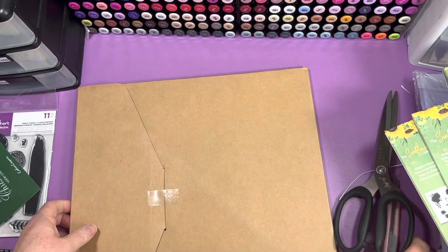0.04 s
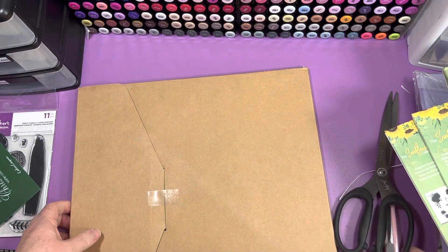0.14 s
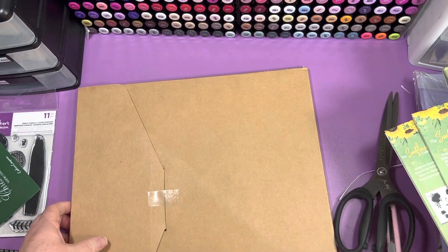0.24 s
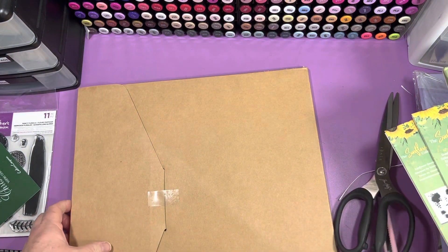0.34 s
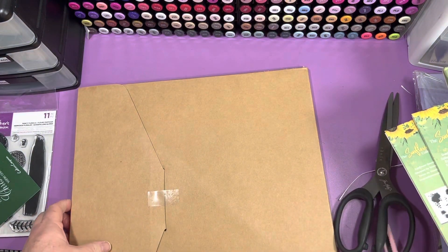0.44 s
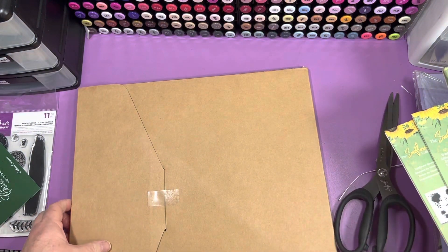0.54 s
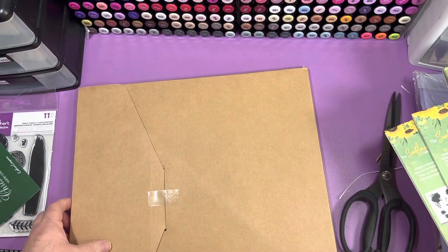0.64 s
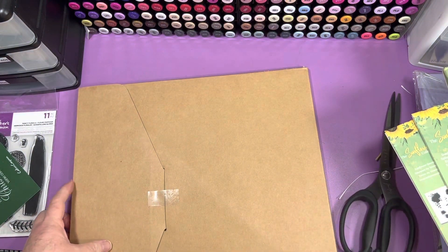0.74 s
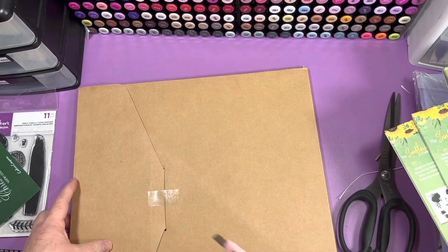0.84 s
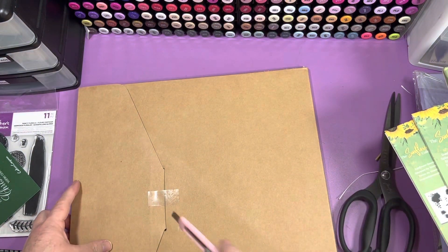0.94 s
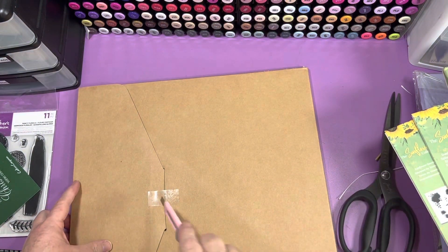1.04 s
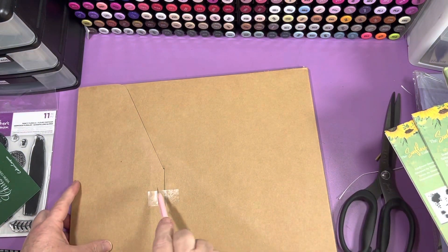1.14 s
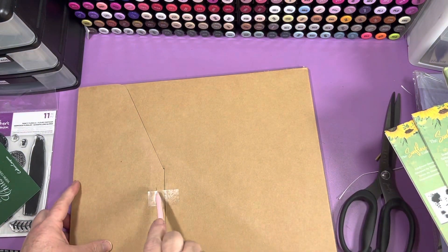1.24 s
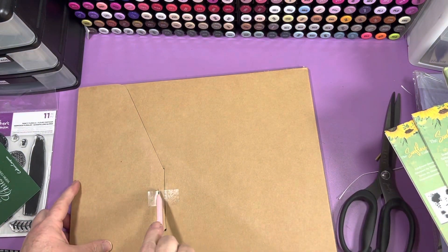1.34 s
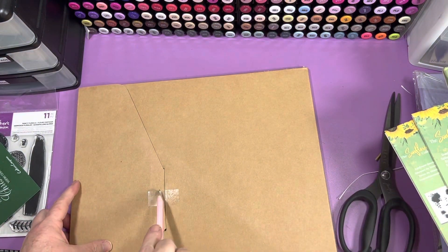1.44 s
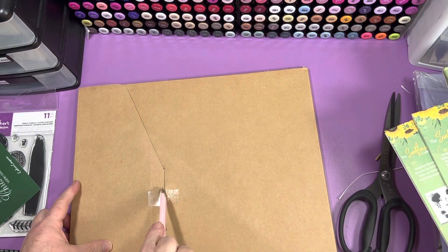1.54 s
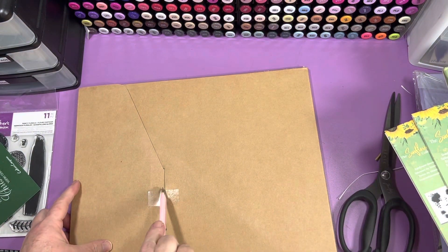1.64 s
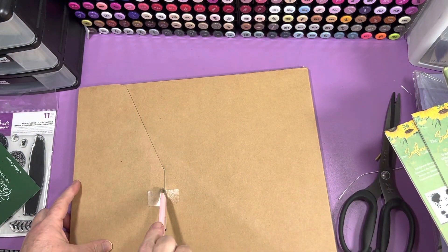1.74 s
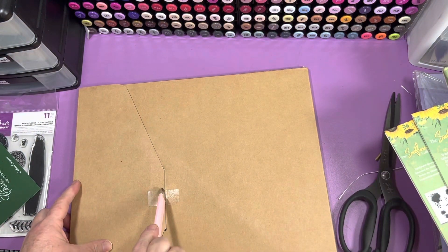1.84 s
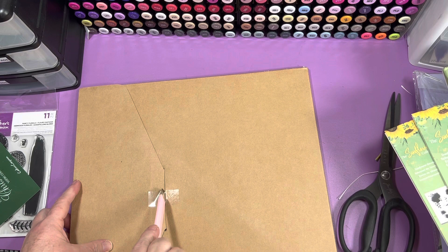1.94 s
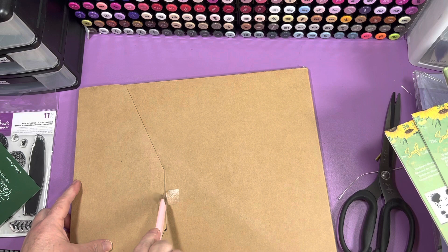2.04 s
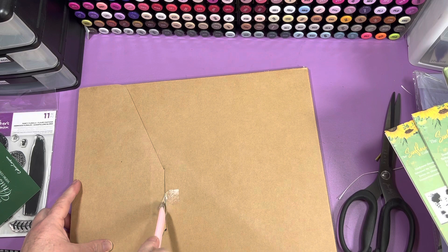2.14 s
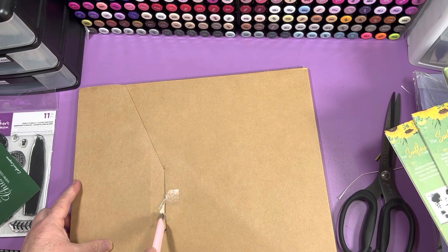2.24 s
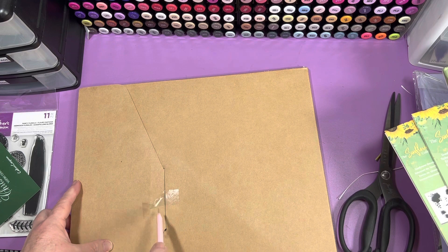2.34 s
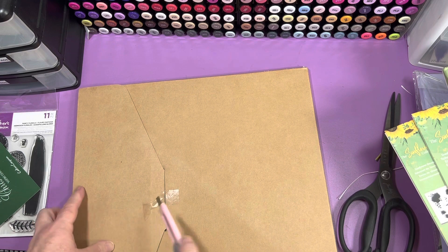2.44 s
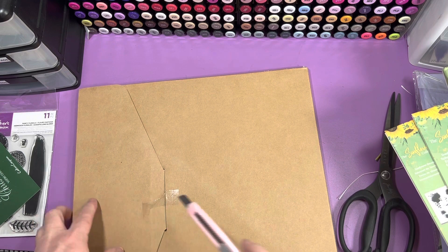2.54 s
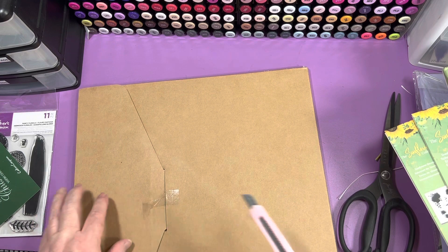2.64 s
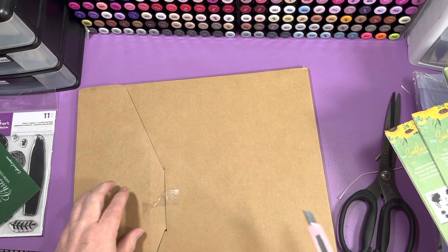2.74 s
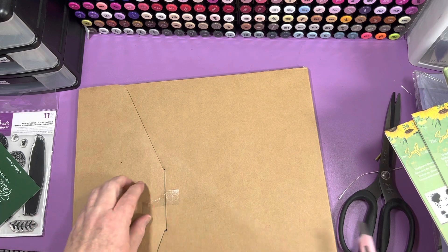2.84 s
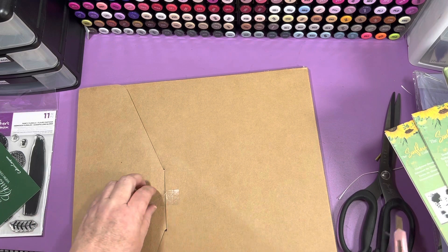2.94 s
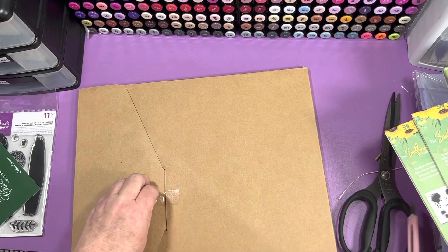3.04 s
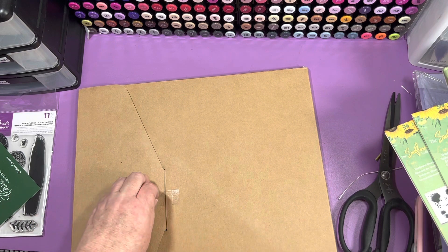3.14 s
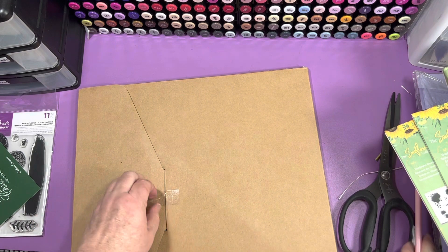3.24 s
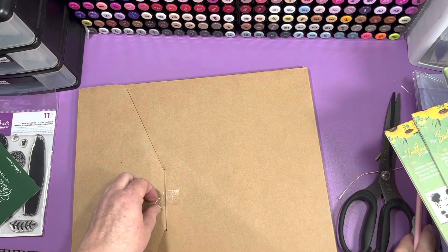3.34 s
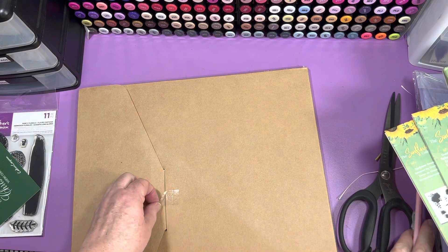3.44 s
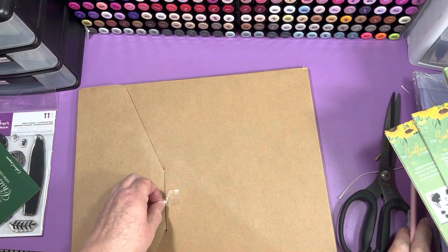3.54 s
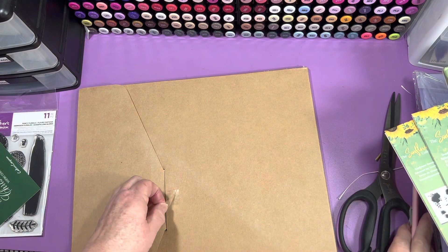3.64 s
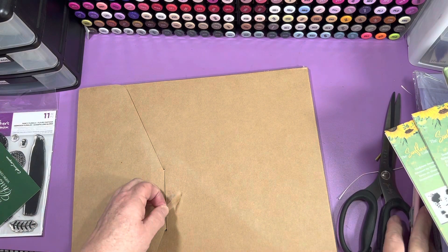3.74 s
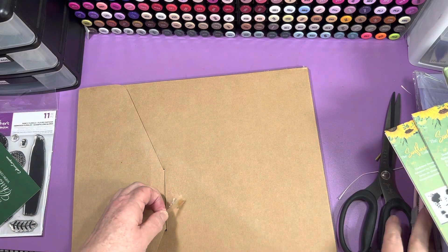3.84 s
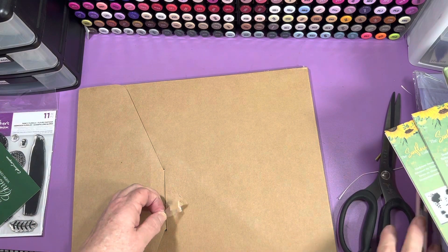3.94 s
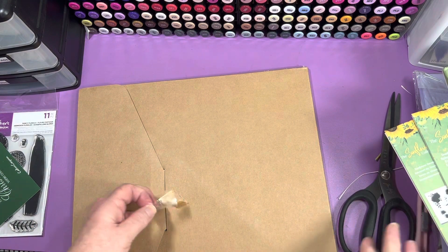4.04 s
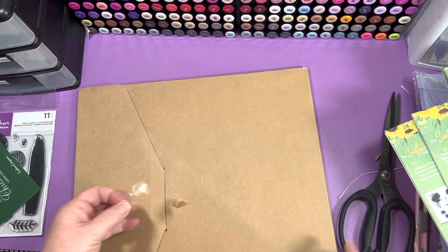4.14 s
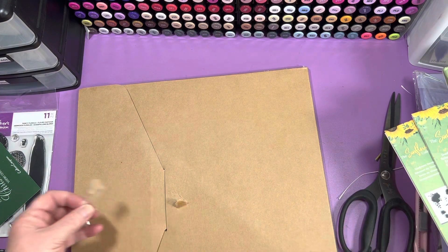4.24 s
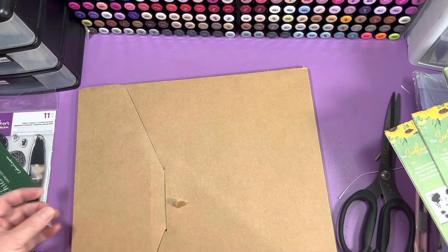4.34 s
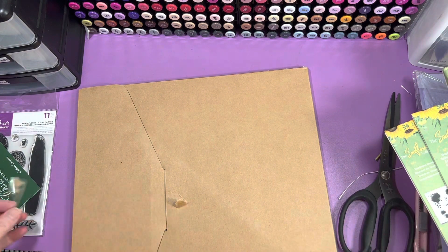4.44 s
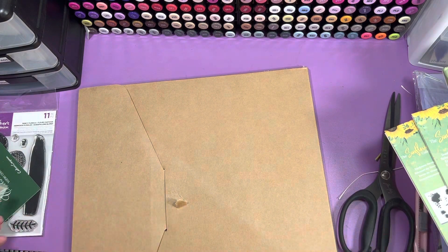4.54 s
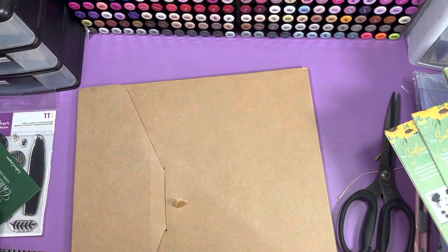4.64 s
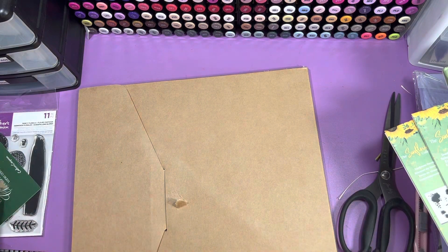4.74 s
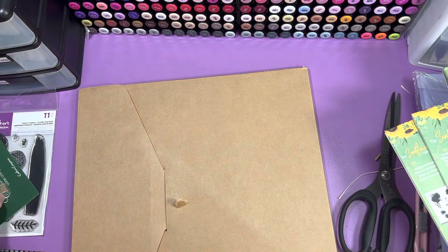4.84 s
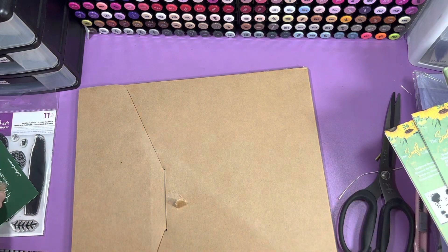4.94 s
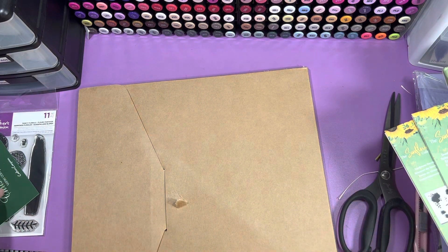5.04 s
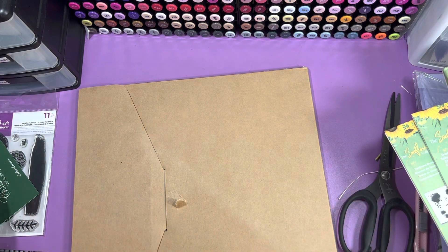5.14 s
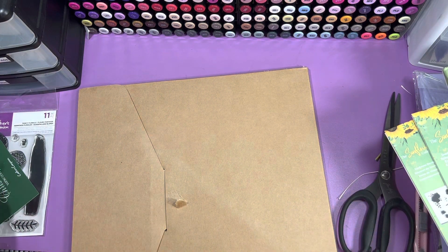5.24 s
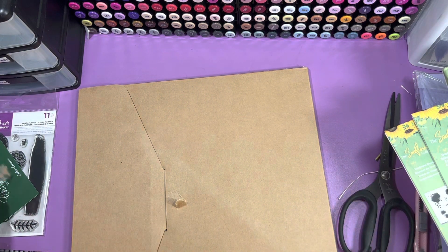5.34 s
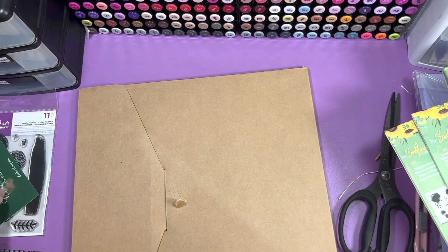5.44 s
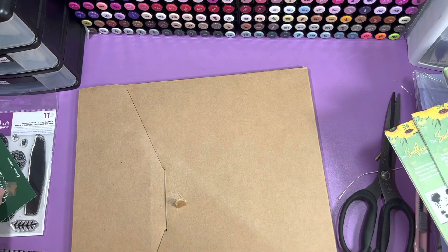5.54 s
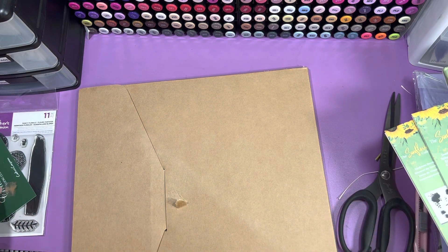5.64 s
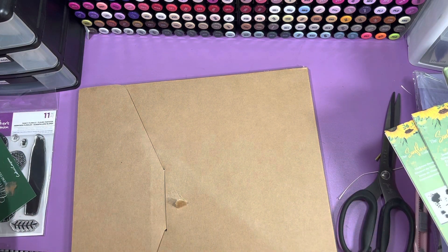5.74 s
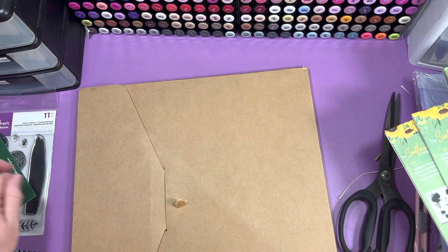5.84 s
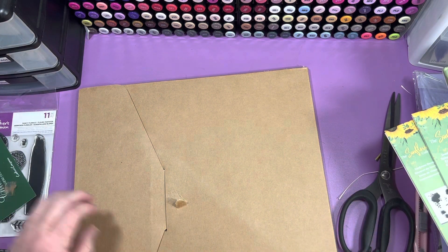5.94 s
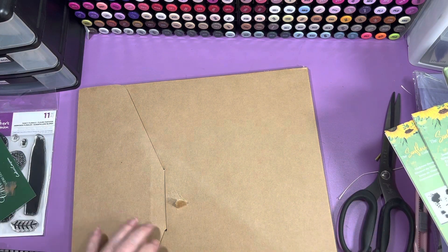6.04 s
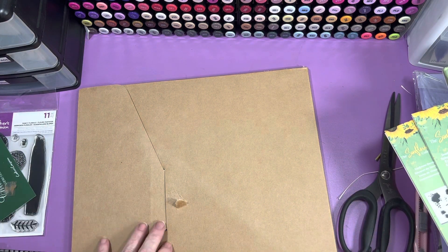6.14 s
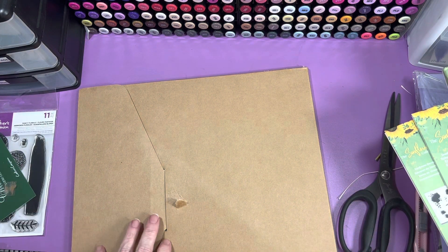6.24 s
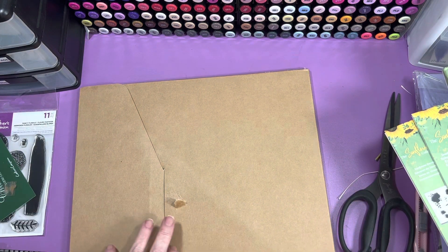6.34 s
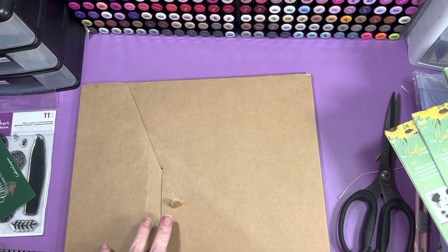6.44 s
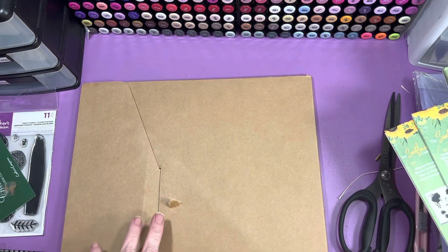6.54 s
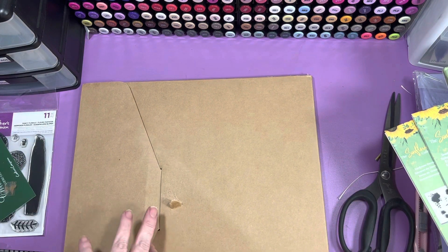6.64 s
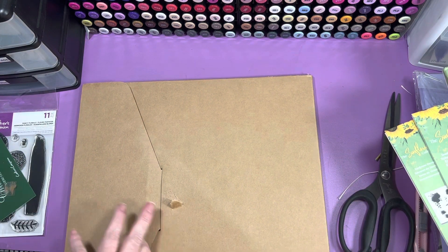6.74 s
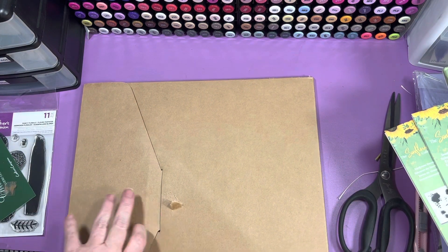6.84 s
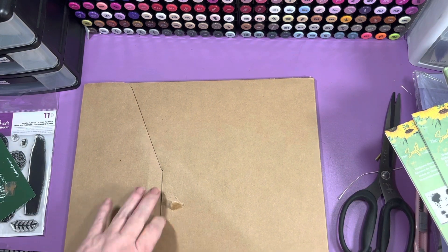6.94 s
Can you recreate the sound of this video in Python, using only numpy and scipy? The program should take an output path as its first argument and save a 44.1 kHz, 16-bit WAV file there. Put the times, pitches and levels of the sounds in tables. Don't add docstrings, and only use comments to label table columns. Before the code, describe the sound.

A knife handled on a desk picks at tape on a hollow cardboard mailer, then the tape rips off in jerks, crackles, and the flap is rubbed.

```python
import sys
import numpy as np
from scipy import signal
from scipy.fft import rfft, irfft
from scipy.io import wavfile
from scipy.ndimage import uniform_filter1d

SR = 44100
rng = np.random.default_rng(int(sys.argv[2]) if len(sys.argv) > 2 else 0)


def file_out(sig):
    cols = np.atleast_2d(sig).T
    lim = np.clip(cols, -1, 1)
    pcm = np.round(lim * 32767).astype(np.int16)
    wavfile.write(sys.argv[1], SR, pcm)


def decibels_to_gain(level_db):
    exponent = np.asarray(level_db, float) / 20
    return 10 ** exponent


N = 308259
FREQ = np.maximum(np.arange(N // 2 + 1) * SR / N, 1)


def unit(x):
    return x / np.sqrt(np.mean(x ** 2))


def along(table):
    hz, value = np.transpose(table)
    return np.interp(np.log(FREQ), np.log(np.maximum(hz, 1)), value)


def through(x, response):
    return irfft(rfft(x) * response, N)


def body(modes):
    response = 0
    for k, (hz, width, db) in enumerate(modes):
        response = response + (-1) ** k * decibels_to_gain(db) / (1 + 1j * (FREQ - hz ** 2 / FREQ) / width)
    return unit(np.abs(response)) * np.exp(1j * np.angle(response))


def walk(rate):
    hold = int(SR / rate)
    steps = np.repeat(rng.standard_normal(N // hold + 1), hold)
    return np.sqrt(1.5) * uniform_filter1d(steps, hold)[:N]


def during(span_s):
    return (np.arange(N) > span_s[0] * SR) & (np.arange(N) < span_s[1] * SR)


def stroke(s, length, db, swell_db):
    attack_db_per_s, release_db_per_s = 1501, 700.5
    end = s + max(length, .01)
    corners_s = [s - 60 / attack_db_per_s, s, end, end + 60 / release_db_per_s]
    corners_db = [db - 60, db, db + swell_db, db + swell_db - 60]
    return decibels_to_gain(np.interp(np.arange(N) / SR, corners_s, corners_db))


# time in seconds, board level in dB, film minus board in dB.
PULL = [(3.48, -56, -8.5), (3.522, -50.5, -1.5), (3.535, -46, -1.5), (3.566, -41.5, -2.5),
        (3.59, -44.5, -2.5), (3.716, -37.5, -6), (3.835, -38, -1.5), (3.9, -42, -2.5), (3.945, -33, -2.5),
        (3.968, -35, -2.5), (3.99, -35, -3), (4.005, -49, 9)]
# start in seconds, length in seconds, board level in dB, swell in dB, film minus board in dB.
KNIFE = [(0.0, 0.025, -54.5, -4, -11.5), (.05, 0.078, -52, 2, -14.5), (.295, 0.016, -64.5, 13, -8),
         (.114, 0.52, -66, 3, -9.5), (.40, 0.067, -69, 14.5, -7), (.455, 0.052, -54.5, 7.5, -10.5),
         (.515, 0.05, -46, 0.5, -11), (.58, 0.21, -56, -15.5, -17), (.69, 0.056, -65, -1.5, -2.5),
         (.78, 0.14, -90.5, 17, -3), (.9, 0.13, -77, 2.5, 2), (1.06, 0.42, -80, -7.5, -9),
         (1.51, 0.024, -63.5, 7, -7.5), (1.6, 0.32, -77, -7, -12), (1.92, 0.12, -53.5, -2, -7),
         (2.0, 0.15, -49.5, -6.5, -6), (2.16, 0.084, -43.5, -7, -10), (2.28, 0.12, -57.5, -5.5, -10),
         (2.42, 0.1, -73.5, 11, 3.5), (2.53, 0.062, -54, 0.5, -15.5), (2.62, 0.24, -75, -8.5, -3.5)]
# start in seconds, length in seconds, board level in dB, swell in dB, film minus board in dB.
FINGERS = [(2.837, 0.18, -50.5, 5.5, -14.5), (3.06, 0.013, -56.5, 7, -16), (3.115, 0.046, -53.5, -4, -19.5),
           (3.22, 0.12, -56.5, 5.5, -16), (3.295, 0.12, -60.5, 2.5, -7), (3.42, 0.06, -75.5, 11, -0.5),
           (4.005, 0.066, -48.5, -10.5, -10), (4.07, 0.079, -72, -14, -8.5), (5.88, 0.059, -64, -10, -16),
           (6.02, 0.11, -70, 25, -10.5), (6.12, 0.264, -59.5, -1.5, -4.5), (6.39, 0.041, -53, 6.5, -16.5),
           (6.44, 0.064, -42.5, 1, -21.5), (6.51, 0.064, -57.5, 0.5, -22), (6.59, 0.2, -62.5, 5, -11),
           (6.79, 0.19, -59.5, -2, -16.5)]
# start in seconds, length in seconds, film level in dB, swell in dB, fizz minus film in dB.
ROLLING = [(4.197, .13, -76.5, 9.5, -2), (4.403, 0.24, -83.5, -4.5, 1.5), (4.602, 0.14, -92.5, -0.5, 3),
           (4.759, 0.15, -63, -19.5, -8), (4.903, 0.11, -66.5, -4.5, 4.5), (5.012, 0.068, -66, -14, -9),
           (5.1, 0.34, -88.5, -3, -9), (5.39, 0.082, -74, -7, 3.5), (5.452, 0.13, -69.5, 2, -6),
           (5.567, 0.32, -82, -15, 1.5), (5.88, 0.32, -76.5, -5, 1.5)]
# time in seconds, level in dB, fizz in dB, ring in Hz.
TEARS = [
    (3.608, -42.5, 1, 1430),
    (3.733, -36.5, 2, 1470),
    (3.823, -34, -3, 1600),
    (3.852, -32.5, -7, 1520),
    (3.88, -39.5, -4.5, 5340),
    (3.908, -30, -5, 1470),
    (3.935, -31.5, 0.5, 615),
    (3.95, -30, 0, 660),
    (3.977, -28, -9, 3500),
    (3.99, -30, -11.5, 601.5),
]


def effort():
    time = np.arange(N) / SR
    s, pull_db, film_db = np.transpose(PULL)
    slack_db = np.zeros(N)
    slack_after_s, slack_s = .014, .005
    for tear in TEARS[:6]:
        slack_db += -4 * np.exp(-.5 * ((time - tear[0] - slack_after_s) / slack_s) ** 2)

    def pull(db):
        return decibels_to_gain(slack_db + np.interp(time, s, db, left=-200, right=-200))

    rip_fizz_db = -1
    out = np.array([pull(pull_db), pull(pull_db + film_db), pull(pull_db + film_db + rip_fizz_db)])
    for table, fizz_db in ((KNIFE, -4), (FINGERS, -7)):
        for *move, film_db in table:
            out = np.maximum(out, stroke(*move) * decibels_to_gain(np.array([[0], [film_db], [film_db + fizz_db]])))
    rolling_board_db = -2
    for *move, fizz_db in ROLLING:
        out = np.maximum(out, stroke(*move) * decibels_to_gain(np.array([[rolling_board_db], [0], [fizz_db]])))
    return out


def slips(rate, spread_db, patchy_db):
    when, sign, size = rng.random(N), rng.standard_normal(N), rng.exponential(size=N)
    size_db = spread_db * np.minimum(size, 3.8) + patchy_db * walk(120)
    return unit((when < rate / SR) * sign * decibels_to_gain(size_db))


def friction():
    board, film, fizz = effort()
    fibres = slips(rate=4000, spread_db=2.4, patchy_db=2.0)
    threads = slips(rate=9000, spread_db=2.2, patchy_db=2.7)
    film_slips = .5 * fibres + 1.02 * threads
    return board * fibres * decibels_to_gain(-5), film * film_slips * decibels_to_gain(-1.5), fizz * threads * decibels_to_gain(2.5)


# centre in Hz, width in Hz, level in dB.
FREE = [(348.5, 440, -5), (980, 373, -1), (1280, 566, -1.5), (1980, 820, -4), (2740, 760, -9)]
TAUT = [(210.5, 72, -7), (310, 550, -10), (530, 170, -1.5), (672, 92, -2), (1280, 260, -2), (1520, 220, 1),
        (2100, 700, -8.5), (5200, 410, -21.5)]
PRESSED = [(367, 180, -6.5), (800, 340, -6), (1210, 270, -2), (1840, 360, -4.5), (3020, 740, -19),
           (4980, 460, -16.5)]
LIFTED = [(543, 370, -6), (1350, 200, 1.5), (1670, 360, -3), (2350, 690, -6.5)]
SKATING = [(700, 500, -6.5), (2070, 250, -2.5), (3750, 1200, -17)]
DRAGGED = [(500, 760, -9.5), (1320, 270, 2.5), (2300, 500, -1), (3380, 1100, -4.5)]


def mailer(push):
    holds = [((3.5, 4.03), TAUT), ((2.82, 3.47), PRESSED), ((6.38, 6.59), LIFTED),
             ((.04, .113), SKATING), ((.46, .583), DRAGGED)]
    held = [(during(span_s), modes) for span_s, modes in holds]
    free = ~np.any([when for when, _ in held], axis=0)
    return sum(through(push * when, body(modes)) for when, modes in held + [(free, FREE)])


# centre in Hz, width in Hz, level in dB.
FILM = [(3436, 860, -6), (4730, 240, -2.5), (7480, 3650, -2), (7750, 1500, 2), (10460, 160, -4.5)]


def tape_film(push):
    return through(push, body(FILM))


# centre in Hz, width in Hz, level in dB.
FIZZ = [(12550, 2200, 1), (13300, 1100, -7), (13720, 2900, -6.5)]


def glue_threads(push):
    return through(push, body(FIZZ))


# time in seconds, level in dB, fizz in dB, ring in Hz.
PICKS = [(0.048, -46.5, -3.5, 2030), (0.119, -30.5, 4, 2930), (0.161, -40, -27, 2980),
         (0.203, -27.5, -2.5, 2460), (2.011, -50, -8.5, 7170), (2.0325, -25, -3.5, 4870),
         (2.047, -36, -3, 1000), (2.091, -32, -3, 2510), (1.15, -63.5, -30, 2990), (2.715, -59.5, -2, 2590),
         (3.385, -47, -1, 1110), (3.507, -41, -19, 7860), (3.5175, -38, -9, 7800), (3.526, -31.5, -6, 2460),
         (3.565, -56, -1.5, 1600), (6.617, -26, -7.5, 4200)]
# time in seconds, level in dB, fizz in dB, ring in Hz.
RASPS = [
    (0.118, -34, 7, 7440),
    (0.312, -40, -7, 6840),
    (0.316, -38, -6, 3840),
    (0.323, -32, -5, 3200),
    (2.333, -34, -0.5, 5600),
    (2.536, -39.5, -8, 1420),
    (3.488, -51, -7, 1450),
    (5.027, -39.5, -8, 6430),
    (6.769, -43.5, -31.5, 2350),
]
# time in seconds, level in dB, fizz in dB, ring in Hz.
DIGS = [(1.507, -54, -4, 1280), (1.52, -53, 1, 6000), (1.533, -49, -28, 1510), (1.67, -51, -38, 800),
        (1.989, -43, 4.5, 7070), (2.01, -34, 4, 7900), (2.075, -33.5, -1, 1210), (2.11, -39.5, 5, 1160),
        (2.134, -43, 1, 1040), (2.174, -31.5, 3, 1280), (2.192, -40, 7, 8700), (2.231, -33.5, -5.5, 1220),
        (2.313, -38, -1, 1110), (2.573, -51, -26, 1600), (2.836, -50, -37, 1874), (6.916, -54.5, -22, 1080)]
# time in seconds, level in dB, fizz of a hard edge in dB, weight on the board in dB.
TAPS = [(0.448, -39.5, -23, -3.5), (0.587, -41, -28, -2), (0.596, -42.5, -34, -1), (0.607, -57, -29, 14.5),
        (0.648, -50, -43, 7.5), (0.677, -46.5, -28, 7), (0.735, -63, -12, 6.5), (1.726, -51.5, -9, -0.5),
        (1.906, -50, 3.5, -3.5), (2.43, -52.5, -20, 2.5), (6.082, -22.5, -18, -11), (6.194, -60, -20, 10),
        (6.221, -54, -15, -8), (6.389, -43, -32, -4.5), (6.547, -51.5, -34.5, 7.5),
        (6.599, -43.5, -16, 0.5), (6.616, -26.5, -6, -7.5), (6.628, -61, -18, -2), (6.647, -43, -26, -11),
        (6.732, -31.5, -2, -1)]
# time in seconds, level in dB, fizz in dB, ring in Hz.
CRACKLES = [(4.298, -37.5, -28, 3720), (4.314, -48, -2, 5380), (4.433, -46, 6, 3290),
            (4.578, -56, -4, 3870), (4.601, -48.5, -5, 3670), (4.744, -57.5, 0.5, 6750),
            (4.761, -40, -6.5, 3600), (4.877, -28.5, 3, 8100), (4.94, -48.5, -4, 2670),
            (5.166, -54, 2, 1350), (5.374, -54.5, -0.5, 927), (5.463, -27.5, 1, 6440),
            (5.532, -62, 11, 7520), (5.564, -39.5, 8, 3270), (5.684, -71.5, 15.5, 970)]
# time in seconds, level in dB, fizz in
# dB, ring in Hz.
SNAPS = [(0.5965, -49, -29, 2500), (0.606, -56, -25, 3000), (2.0135, -34, -3, 7200), (2.11, -39, 3, 2965),
         (2.1745, -24.5, 1.5, 5070), (2.191, -33.5, 6.5, 6000), (2.1945, -26.5, -4, 8200),
         (2.2317, -46.5, 3.5, 4070), (2.2936, -52, -11, 1130), (2.3335, -45.5, 6, 5360),
         (3.5675, -31, -24, 8300), (3.643, -37.5, -1.5, 1320), (3.6934, -32.5, -2, 4500),
         (3.7707, -31, -3.5, 2000), (3.756, -36.5, -8, 999), (4.811, -59, -5.5, 3000),
         (4.86, -56.5, -7.5, 3000), (4.887, -46.5, -0.5, 3950), (5.029, -37.5, 1, 5200)]
# centre in Hz, width in Hz, level in dB.
CRACK = [(3007, 2110, 9), (4250, 4020, 9.5), (8700, 2800, 4)]


def snaps():
    board, fizz, bright = np.zeros((3, N + SR))
    t = np.arange(SR // 10) / SR
    tick = decibels_to_gain(5.0 - 60 * t / 0.0022) + decibels_to_gain(-60 * t / 0.011) + decibels_to_gain(-26.0 - 60 * t / 0.13)
    tick = np.minimum(t / 0.00019, 1) * tick
    rasp = np.minimum(t / 0.005, 1) ** 2 * decibels_to_gain(-60 * np.maximum(t - .0055, 0) / 0.019)
    tap = np.minimum(t / 0.0024, 1) * (decibels_to_gain(-60 * t / 0.013) + decibels_to_gain(-20.5 - 60 * t / 0.13))
    crack = irfft(body(CRACK), N)[:256]

    def with_board(table, board_db):
        return [(s, db, fizz_db, board_db, hz) for s, db, fizz_db, hz in table]

    rasps = with_board(RASPS, -21.5) + with_board(DIGS, -13) + with_board(TEARS, -8.5)
    taps = [(*row, 1350) for row in TAPS]
    # events, shape, seconds from onset to the listed time, crack dB
    groups = ((with_board(PICKS, -17), tick, -.0008, 0),
              (rasps, rasp, .003, 0),
              (taps, tap, 0, -1),
              (with_board(CRACKLES, -25.5), tick, -.0008, -1.5),
              (with_board(SNAPS, -17), tick, -.0008, 0))
    for table, shape, early, crack_db in groups:
        noises = rng.standard_normal((len(table), len(t)))
        for (s, db, fizz_db, board_db, hz), noise in zip(table, noises):
            if shape is tick:
                clean_break = np.arange(len(t)) == int(.0003 * SR)
                noise = noise + decibels_to_gain(13) * np.sign(noise[0]) * clean_break
            burst = noise * shape
            burst = decibels_to_gain(db) * burst * np.sqrt(np.sum(shape ** 2) / np.sum(burst ** 2))
            start = int((s - early) * SR)
            at = slice(start, start + len(t))
            board[at] += burst * np.minimum(t / 0.0015, 1) * decibels_to_gain(board_db + 6.0)
            fizz[at] += burst * decibels_to_gain(fizz_db - 2.5)
            bright[at] += np.convolve(burst, crack)[:len(t)] * decibels_to_gain(crack_db - 9.5)
            ring = signal.iirpeak(hz, 1.6, fs=SR)
            bright[at] += signal.lfilter(*ring, signal.lfilter(*ring, burst)) * decibels_to_gain(0.5)
    return board[:N], fizz[:N], bright[:N]


# start in seconds, level in dB, pitch in Hz, length in seconds.
RINGS = [(0.203, -47.5, 3230, 0.0019), (0.2033, -39, 1370, 0.0019), (1.534, -54, 1450, 0.0044),
         (1.669, -56, 800, 0.0032), (1.757, -70.5, 472, 0.064), (1.791, -80, 690, 0.053),
         (2.033, -45.5, 830, .008), (2.089, -51, 800, 0.026), (2.168, -56.5, 870, 0.0053),
         (2.233, -54, 800, 0.0055), (5.435, -62, 6500, 0.0028), (6.082, -44.5, 851, 0.0091),
         (6.226, -52.5, 296, 0.0053), (6.217, -55, 655, 0.011), (6.62, -45.5, 510, 0.014),
         (3.541, -43.5, 1390, 0.0062), (3.556, -45, 1470, 0.0087), (3.754, -49, 800, 0.0078),
         (0.319, -48, 3200, 0.0051), (2.008, -42.5, 7100, 0.0041), (2.795, -76, 3260, 0.014),
         (2.832, -48, 1820, 0.006), (2.957, -65, 4770, .012), (2.973, -60.5, 4840, 0.022),
         (3.511, -62, 8100, .003), (3.515, -41, 7840, 0.0026), (3.535, -38, 7840, 0.0033),
         (3.604, -46.5, 8100, 0.0098), (3.654, -53.5, 5200, 0.045), (3.816, -46.5, 5000, 0.013),
         (3.82, -38.5, 1598, 0.0057), (3.849, -44, 1600, 0.0062), (3.881, -41.5, 1540, 0.0054),
         (3.878, -42.5, 5130, 0.026), (3.912, -46, 5200, 0.019), (3.942, -40, 1530, 0.012),
         (3.93, -35.5, 640, 0.006), (3.955, -37.5, 664, 0.011), (3.972, -31, 1520, 0.017),
         (3.976, -42.5, 600, 0.014), (5.554, -65, 3360, 0.0048), (6.555, -51, 1310, 0.006),
         (6.57, -57, 1300, .005), (6.614, -33.5, 1350, 0.0054), (6.611, -41.5, 2440, 0.0067),
         (6.728, -41, 1206, 0.0063), (6.762, -48.5, 2350, 0.009)]


def rings():
    out, t = np.zeros(N + SR), np.arange(SR // 10) / SR
    rise_s, t60_s, min_width_hz = 0.0026, 0.02, 120
    for (s, db, hz, length), noise in zip(RINGS, rng.standard_normal((len(RINGS), len(t)))):
        shape = np.minimum(t / rise_s, 1) * decibels_to_gain(-60 * np.maximum(t - length, 0) / t60_s)
        ring = signal.iirpeak(hz, min(38, hz / min_width_hz), fs=SR)
        tone = signal.lfilter(*ring, noise * shape)
        start = int(s * SR)
        out[start:start + len(t)] += decibels_to_gain(db) * tone * np.sqrt(np.sum(shape ** 2) / np.sum(tone ** 2))
    return out[:N]


# time in seconds, level in dB, pitch in Hz, t60 in seconds.
THUDS = [
    (0.603, -30.5, 62.4, 0.21),
    (0.661, -25.5, 68, 0.082),
    (2.111, -42, 55, 0.17),
    (2.584, -37, 40, 0.22),
    (3.72, -45.5, 170, 0.23),
    (3.987, -40, 110, 0.15),
    (4.04, -44.5, 248, 0.087),
    (6.088, -34.5, 124, 0.1),
    (6.625, -45, 147, 0.082),
]
# time in seconds, level in dB, pitch in Hz.
PATS = [(0.05, -51, 172.6), (0.591, -35.5, 161), (1.723, -50.5, 239), (2.01, -45.5, 370), (2.046, -47, 300),
        (2.084, -39.5, 343), (2.139, -44.5, 289), (2.109, -40.5, 215), (2.174, -56, 194), (2.231, -50, 482),
        (2.577, -46.5, 187), (2.877, -48.5, 203), (3.981, -29.5, 231), (6.089, -38.5, 151),
        (6.21, -44, 166), (6.222, -40, 217), (6.626, -42, 166), (6.734, -51, 345)]
# time in seconds, level in dB, pitch in Hz, t60 in seconds.
CLACKS = [(0.119, -35, 2280, 0.023), (0.121, -35, 4300, 0.014), (0.153, -49, 3460, 0.014),
          (0.161, -41, 3000, .014), (0.203, -32, 2170, 0.0093), (0.2035, -32, 3250, .012),
          (0.315, -41.5, 3800, 0.014), (0.324, -37, 3110, .02), (4.299, -49, 3730, 0.013),
          (4.308, -56, 2900, .015), (5.565, -50, 3210, .02), (0.120, -38.5, 1290, 0.013),
          (3.96, -34, 700, .04), (3.979, -33, 2100, .015), (0.450, -42, 1370, 0.013),
          (0.589, -34.5, 2400, 0.011), (0.589, -35.5, 1290, .016), (0.597, -49, 1590, .012),
          (0.606, -43, 1480, 0.015), (0.651, -39, 2460, .012), (0.679, -48, 1580, 0.011),
          (2.012, -42, 880, 0.039), (2.172, -39, 1080, 0.027), (2.232, -39, 1140, 0.033),
          (3.610, -35, 1440, 0.016), (3.679, -31, 1450, 0.017), (3.770, -32, 1500, 0.022),
          (3.853, -29, 1510, 0.024), (3.880, -31, 1527, .025), (3.880, -35, 5120, .05),
          (3.908, -32, 1630, 0.018), (3.935, -29, 1500, .025), (3.977, -27.5, 1580, 0.023),
          (3.987, -33, 1504, .02), (6.083, -36, 1570, .02), (6.084, -52, 603, 0.022),
          (6.197, -50, 900, 0.017), (6.617, -33.5, 2500, .015), (6.618, -26, 1060, 0.014),
          (6.629, -42, 1290, .02), (6.648, -46, 1300, .012), (6.734, -27, 1290, 0.021),
          (6.734, -28, 2300, 0.013)]


def thuds():
    out, t = np.zeros(N + SR), np.arange(SR // 2) / SR
    pats = [(*pat, .09) for pat in PATS]
    for s, db, hz, t60 in THUDS + pats + CLACKS:
        push = np.minimum(t * hz / 0.29, 1)
        swing = np.sin(2 * np.pi * hz * t * (1 - 0.14 * t)) * push
        out[int(s * SR):int(s * SR) + len(t)] += decibels_to_gain(db - 60 * t / t60) * swing
    return out[:N]


def echo(t60):
    tail = rng.standard_normal(N) * decibels_to_gain(-60 * np.arange(N) / SR / t60)
    return rfft(tail / np.sqrt(np.sum(tail ** 2)))


def shifting(x, t60, turns_hz):
    angle = np.cumsum(walk(turns_hz)) * 2 * np.pi * turns_hz / SR
    return np.cos(angle) * through(x, echo(t60)) + np.sin(angle) * through(x, echo(t60))


# frequency in Hz, density in dB per Hz.
HUSH = [(25, -23), (40, -7.5), (57, 4.5), (80, -6.5), (105, 0), (160, -9), (250, -20), (400, -29.5),
        (700, -41), (1500, -45.5), (4000, -55), (9500, -66.5), (12500, -52), (16000, -58.5)]


def hush():
    noise = unit(through(rng.standard_normal(N), decibels_to_gain(along(HUSH))))
    return noise * decibels_to_gain(-52.5 + 1.1 * walk(0.9))


# frequency in Hz, lead of the left port in radians.
LEAD = [(300, 0), (700, .4), (1400, 0), (3400, 1.4), (5500, 0), (6900, -.2), (8300, -1.2), (10200, -3.1),
        (11700, -4.8), (13300, -6.3), (14500, -6.8), (16000, -8.7)]
# frequency in Hz, left minus right in dB.
LEAN = [(60, -2.2), (150, -.7), (300, -.3), (550, 1.3), (1100, .5), (2500, 1.5), (4000, 5), (5800, 7),
        (7500, 2), (9000, 0)]
# frequency in Hz, likeness from 0 to 1.
ALIKE = [(60, .92), (150, .94), (300, .92), (700, .93), (1400, .93), (2700, .65), (5800, .35), (7500, .7),
         (10000, .74), (16000, .76)]


def two_ports(heard):
    alike = np.clip(along(ALIKE), 0, 1)
    direct = through(heard, alike * np.exp(-1j * along(LEAD)))
    scattered = through(shifting(heard, 0.04, 25.), np.sqrt(1 - alike ** 2))
    lean_db = along(LEAN) / 2
    return np.array([through(heard, decibels_to_gain(lean_db)), through(direct + scattered, decibels_to_gain(-lean_db))])


def scene():
    board, film, fizz = friction()
    knocks, sparks, bright = snaps()
    near = mailer(board + knocks) + tape_film(film) + glue_threads(fizz + sparks)
    near = near + bright + thuds() + rings()
    room = decibels_to_gain(-9) * shifting(near, t60=0.11, turns_hz=3.0)
    return two_ports(near + room + hush())


def low_pass(x):
    return signal.sosfilt(signal.butter(12, 16990, fs=SR, output="sos"), x)


def record(dry):
    return low_pass(dry)


dry = scene()
out = record(dry)
file_out(out)
```